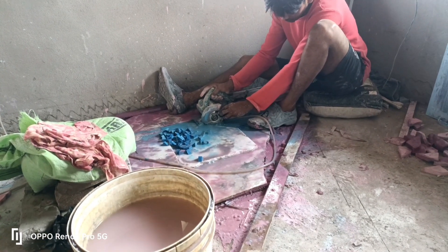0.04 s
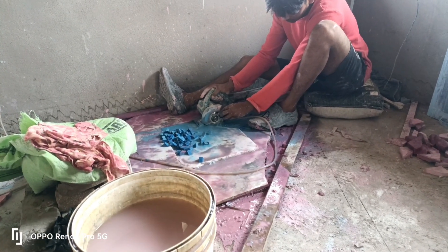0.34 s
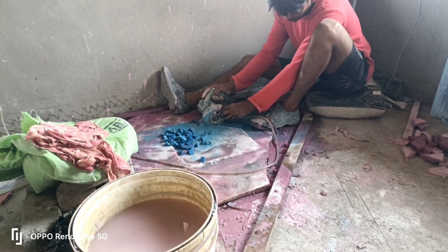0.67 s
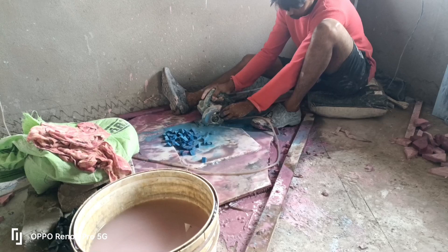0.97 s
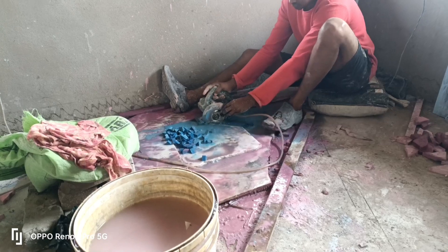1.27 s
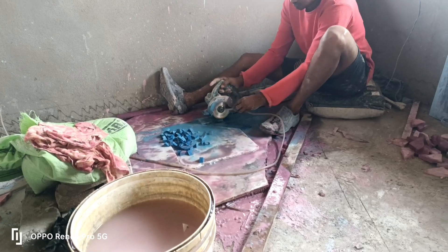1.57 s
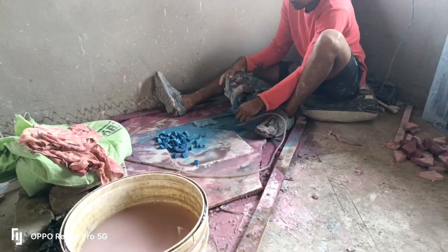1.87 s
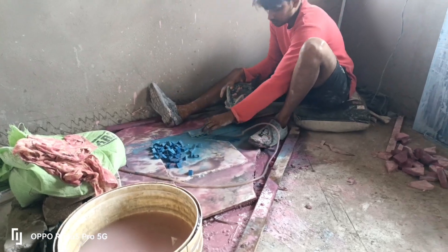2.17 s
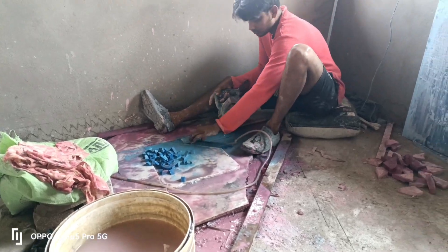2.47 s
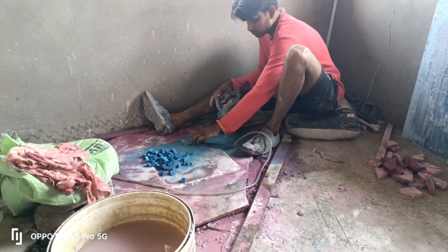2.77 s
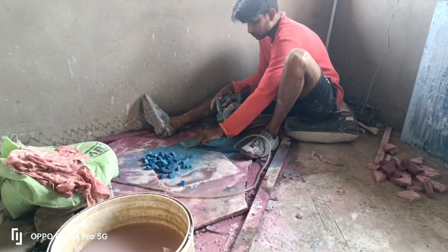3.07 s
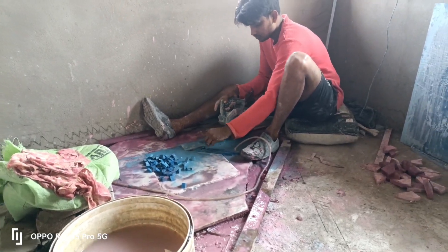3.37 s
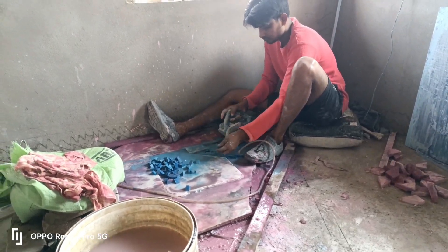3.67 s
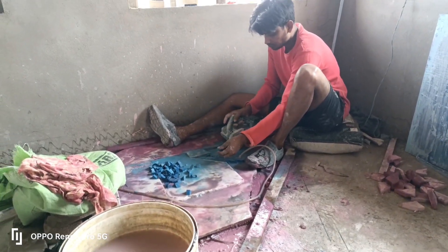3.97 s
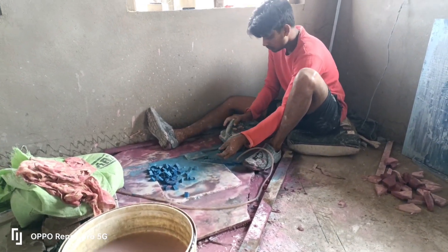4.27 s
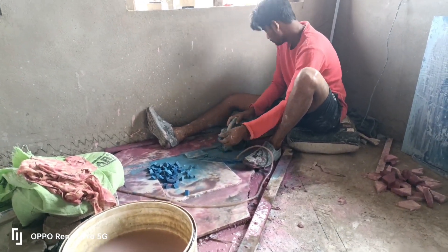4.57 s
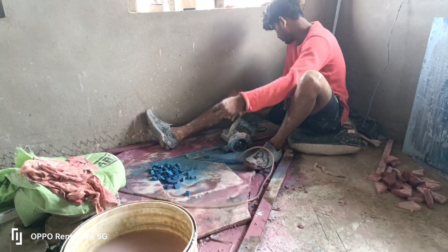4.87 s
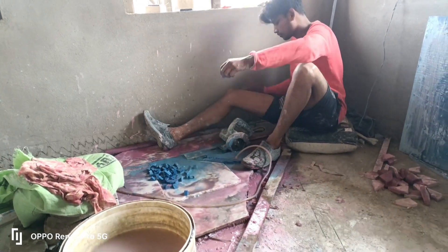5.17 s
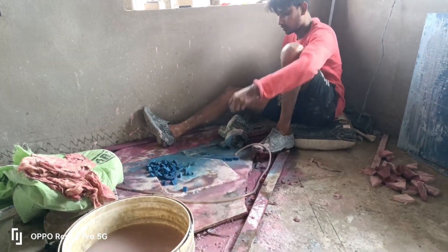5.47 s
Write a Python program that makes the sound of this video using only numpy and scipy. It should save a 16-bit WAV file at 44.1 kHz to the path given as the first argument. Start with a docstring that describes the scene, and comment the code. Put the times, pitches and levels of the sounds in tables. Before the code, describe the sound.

In a bare room, a power cutter rasps through stone with a gritty hiss and a high ringing from the blade, puffs of air thumping the microphone at first. After under two seconds it is switched off and its whine slides steadily downward. A quick cluster of clacks and thumps follows as it is put down, then light scraping and a sharp stone clink above a faint hum.

```python
"""A handheld electric cutter grinds through marble in a bare room, its air blast buffeting the left mic.
The rim bites on every turn and buzzes until the stone crumbles; grit hisses and the blade sings.
Lifted and switched off, the motor coasts down, its falling whine sweeping the housing resonances.
The cutter clatters onto the stone floor, body and blade ringing.
Small scrapes and a clink of stone follow over a low, distant drone."""
import sys
import numpy as np
from scipy import signal
from scipy.fft import rfft, irfft, next_fast_len
from scipy.io import wavfile

SR = 44100
rng = np.random.default_rng(int(sys.argv[2]) if len(sys.argv) > 2 else 0)


def bounce(signal):
    """Save signal as a 16-bit WAV file at the path given by the first command-line argument."""
    frames = np.transpose(np.atleast_2d(signal))
    limited = np.clip(frames, -1, 1)
    pcm = np.round(limited * 32767).astype(np.int16)
    wavfile.write(sys.argv[1], SR, pcm)


N = 248283
TIME = np.arange(N) / SR
FREQS = np.maximum(np.arange(N // 2 + 1) * SR / N, 1)


def from_db(db):
    """Decibels to gain."""
    return 10 ** (np.asarray(db) / 20)


def rms_one(x):
    """Scale to unit power."""
    return x / np.sqrt(np.mean(x ** 2) + 1e-20)


def in_time(rows):
    """Each column of a curve at every sample."""
    s, *columns = np.transpose(rows)
    return [np.interp(TIME, s, c) for c in columns]


def at_hz(points, hz):
    """Read a spectrum on a log-frequency axis."""
    f, value = np.transpose(points)
    return np.interp(np.log(hz), np.log(f), value)


def ramp(start_s, length_s):
    """Linear rise from 0 to 1."""
    return np.clip((TIME - start_s) / length_s, 0, 1)


def swell(centre_s, length_s, t=TIME):
    """Gaussian bell in time."""
    return np.exp(-(2 * (t - centre_s) / length_s) ** 2)


def dying(after_s, t60):
    """Gain 1, then exponential decay."""
    return from_db(-60 * np.maximum(TIME - after_s, 0) / t60)


def fading(hz, knee_hz):
    """Gain that falls steeply below a knee."""
    return 1 / np.sqrt(1 + (knee_hz / hz) ** 6)


def drift(rate_hz):
    """Slow random wander, rms 1."""
    hop, settle = 40, 2000
    r = np.exp(-2 * np.pi * hop * rate_hz / SR)
    slow = signal.lfilter([1], [1, -2 * r, r * r], rng.standard_normal(N // hop + settle + 2))[settle:]
    return np.interp(np.arange(N) / hop, np.arange(len(slow)), rms_one(slow))


def shape(points):
    """Gain per frequency of a spectrum, falling steeply past its ends."""
    low, high = points[0][0], points[-1][0]
    skirts = np.sqrt((1 + (low / FREQS) ** 8) * (1 + (FREQS / high) ** 16))
    return from_db(at_hz(points, FREQS)) / skirts


def resonances(modes):
    """Gain per frequency of steep-sided resonances, summed in power."""
    power = 0
    for hz, width, db in modes:
        detuning = (FREQS - hz ** 2 / FREQS) / (2 * width)
        power = power + from_db(db) ** 2 / width / (1 + detuning ** 2) ** 2
    return np.sqrt(power)


# Channel likeness: f/Hz, correlation
LIKENESS = [(40, 0.52), (150, 0.97), (300, 0.89), (700, 0.72), (1200, 0.01), (2500, 0.04), (15000, 0.027)]

def stereo(mid, side, hz):
    """Left and right spectra, alike in the bass and diffuse in the treble."""
    alike = at_hz(LIKENESS, hz)
    return np.sqrt(1 + alike) * mid + np.sqrt(1 - alike) * side * [[1], [-1]]


def noise(gain):
    """Coloured stereo noise, rms 1."""
    size = next_fast_len(N, real=True)
    f = np.maximum(np.arange(size // 2 + 1) * SR / size, 1)
    mid, side = rng.standard_normal((2, 2 * len(f))).view(complex)
    return rms_one(irfft(np.interp(f, FREQS, gain) * stereo(mid, side, f), size)[:, :N])


def band(hz, width_hz):
    """One band of stereo noise, rms 1."""
    return noise(resonances([(hz, width_hz, 0)]))


def room(x, t60, direct_db):
    """Bare walls: direct sound plus a dense tail, different at each port."""
    t = TIME[:SR // 2]
    tail = rng.standard_normal((2, len(t))) * from_db(-60 * t / t60)
    tail /= np.sqrt(np.sum(tail ** 2, axis=1, keepdims=True))
    direct = from_db(direct_db)
    return (direct * x + signal.fftconvolve(x[None], tail, axes=1)[:, :N]) / np.sqrt(1 + direct ** 2)


# Envelope of the low hum, then of the closing drone: t/s, level/dB
HUM_SWELL = [(2.05, -54.5), (2.194, -49), (2.33, -41), (3.152, -40), (3.85, -50), (4.6, -39.5),
             (5.0, -38.5), (5.6, -33.5)]
# Hum resonances, and upper ones that join for the drone: f/Hz, width/Hz, level/dB
HUM_MODES = [(272, 58, 6), (327, 39, 1.5)]
DRONE_UPPER = [(452, 28, 2), (580, 170, -6.5)]
# Room noise spectra: f/Hz, density/dB
AIR = [(25, -8), (55, 13.5), (90, -9), (150, -12), (300, 3.5), (600, 2), (1000, -0.5), (1500, -4.5),
       (2400, -2), (3400, -5.5), (4500, -13.5), (6500, -29), (8300, -25.5), (14000, -41)]
RUMBLE = [(13, -46), (22, 4), (43, 3), (86, 9.5), (156, 7), (183, 0), (220, 10), (290, -21), (480, -120)]

def background():
    """Over room noise, a hum near 300 Hz swells in the coast-down; a distant drone rises at the end."""
    upper = from_db(-4.5) * ramp(3.53, 1.4) * noise(resonances(DRONE_UPPER))
    hum = from_db(in_time(HUM_SWELL)[0]) * (noise(resonances(HUM_MODES)) + upper)
    air = from_db(-47.5) * noise(shape(AIR))
    rumble = noise(shape(RUMBLE)) * from_db(-52.5 + 2 * drift(30))
    return hum + air + rumble


# Scrapes: t/s, length/s, f/Hz, width/Hz, level/dB
SCRAPES = [(3.645, 0.065, 1580, 724, -34), (4.023, 0.13, 844, 110, -22.5), (4.63, 0.36, 3500, 420, -45),
           (5.228, 0.25, 3560, 110, -47.5), (5.5, 0.0044, 8200, 500, -51), (5.509, 0.0029, 7940, 1800, -41),
           (5.543, 0.1, 5970, 4040, -55.5), (5.62, 0.044, 930, 596, -34)]
# Bumps: t/s, length/s, f/Hz, level/dB
BUMPS = [(1.47, 0.055, 125, -38), (2.254, 0.28, 86, -45.5), (3.112, 0.018, 80, -44),
         (3.805, 0.013, 54.6, -36), (4.477, 0.3, 106, -35.5)]

def scrapes_and_bumps():
    """Short swells of friction on stone, and dull bumps of a body shifting on the floor."""
    friction = sum(from_db(db) * swell(s, length) * band(hz, width)
                   for s, length, hz, width, db in SCRAPES)
    bumps = sum(from_db(db) * swell(s, length) * band(hz, hz / 2) for s, length, hz, db in BUMPS)
    return friction * from_db(drift(90)) + bumps


def add_blow(out, s, blow, rise_s=0.0014):
    """Mix in a blow at time s, with a short rise."""
    at = min(round(s * SR), N - 1)
    size = blow.shape[1]
    out[:, at:at + size] += (blow * (1 - np.exp(-TIME[:size] / rise_s)))[:, :N - at]


def ringing(modes, blow_db, spread_db):
    """Struck modes; the higher ones reach the two ports out of step."""
    t = TIME[:SR // 2]
    hz, db, t60 = np.transpose(modes)[:, :, None]
    strength = from_db(db + blow_db + spread_db * rng.standard_normal(hz.shape))
    polarity = np.pi * rng.integers(0, 2, hz.shape)
    phase = polarity + rng.standard_normal((2, *hz.shape)) * np.minimum(hz / 1200, 2)
    return (strength * from_db(-60 * t / t60) * np.sin(2 * np.pi * hz * t + phase)).sum(axis=1)


# Steel blade modes: f/Hz, level/dB, t60/s
BLADE_MODES = [(1669, -7, .28), (2363, -3, .22), (2910, 1, .4), (3260, -1, .3), (3400, 5, .35),
               (3480, 3, .38), (4060, 1, .5), (4963, -12, .29), (5190, -8, .45), (8570, -2, .27)]

def blade_ring(clacks, gain_db=-3.5, favour_octaves=0.054, splits=4, detune=0.006):
    """Each contact point favours one pitch; pressed on the floor, modes split into close partials."""
    out = np.zeros((2, N))
    for s, _, _, blade_db, favoured_hz, favour_db in clacks:
        modes = []
        for hz, db, t60 in BLADE_MODES:
            boost_db = favour_db * np.exp(-(np.log2(hz / favoured_hz) / favour_octaves) ** 2)
            modes += [(hz * rng.normal(1, detune), db + boost_db, t60) for _ in range(splits)]
        add_blow(out, s, ringing(modes, blade_db + gain_db, spread_db=1))
    chatter = 1 + 0.25 * drift(90)
    return out * chatter


# Hard floor contacts: t/s, level/dB, tilt/(dB/octave), blade level/dB, favoured f/Hz, favour/dB
CLACKS = [(3.885, -15.5, 6, -32, 3330, 7.5), (3.948, -20, 7, -39.5, 3400, 5),
          (3.975, -24.5, -2.5, -51, 5190, 18), (4.001, -25, 8.5, -34.5, 2910, 10.5),
          (4.04, -18, 1.7, -30, 3450, 3), (4.336, -17.5, 3.5, -53.5, 2363, 29.5),
          (4.353, -18.5, 1, -55, 2363, 27), (4.408, -33.5, -5, -63, 2363, 12),
          (5.507, -40.5, 0.5, -57, 8570, 3)]
# The cutter's weight landing and rocking: t/s, level/dB, strongest push f/Hz
THUMPS = [(3.894, -6.5, 275), (3.947, -21, 260), (4, -18, 245), (4.406, -15.5, 231), (4.437, -18, 243),
          (4.476, -27, 166), (4.529, -24, 208)]
# Clinks on stone: t/s, level/dB
CLINKS = [(4.064, -24), (5.544, -37.5), (5.606, -20), (5.625, -13)]
# Force spectra: f/Hz, level/dB
CLACK_FORCE = [(190, -18.5), (270, 1.5), (900, -3.5), (3600, -10), (8600, -29)]
CLINK_FORCE = [(110, -49), (190, -27), (270, -51), (900, -53), (3600, 5), (8600, -10)]
# Thump force spectrum: multiple of the push frequency, level/dB
THUMP_FORCE = [(.6, -33.5), (1, -0.5), (2, -14.5), (4, -51), (14, -24), (32, -44)]
# Cutter body modes: f/Hz, level/dB, t60/s
BODY_MODES = [(125, 5.5, 0.13), (198.5, -3, 1), (262.6, 5, 0.25), (318.3, -5, 0.24), (510, -2.5, 0.2),
              (699, 4, 0.16), (777, -3, 0.21), (886, 5.5, 0.055), (994, -6, 0.5), (1300, 0, 0.1),
              (1813, -6, 0.32), (2325, -10.5, 0.57), (3260, -9.5, 0.24)]
# Diffuse room clatter: f/Hz, density/dB
CLATTER = [(50, -3), (130, 19.5), (260, 4), (450, -5.5), (900, 0), (1500, -7.5), (2400, -13), (3600, -10.5),
           (4500, -19), (5500, -23.5), (6500, -28), (8600, -19), (11000, -24.5), (15000, -30)]

def knocks(body_db=-3.5, clatter_db=9, room_t60=0.52):
    """Each blow rings the cutter's body and sets off a room clatter; clacks also ring the blade."""
    out, t = np.zeros((2, N)), TIME[:SR // 2]
    f = np.maximum(np.arange(len(t) // 2 + 1) * SR / len(t), 1)
    clatter = np.interp(f, FREQS, shape(CLATTER))
    blows = [(s, [(hz, db + part + tilt * np.log2(hz / 900)) for hz, part in CLACK_FORCE])
             for s, db, tilt, *_ in CLACKS]
    blows += [(s, [(k * hz, db + part) for k, part in THUMP_FORCE]) for s, db, hz in THUMPS]
    blows += [(s, [(hz, db + part) for hz, part in CLINK_FORCE]) for s, db in CLINKS]
    mode_hz = np.array(BODY_MODES)[:, :1]
    for s, force in blows:
        body = ringing(BODY_MODES, at_hz(force, mode_hz) + body_db, spread_db=0)
        mid, side = rfft(rng.standard_normal((2, len(t))))
        colour = clatter * from_db(at_hz(force, f) + clatter_db)
        diffuse = irfft(colour * stereo(mid, side, f), len(t))
        add_blow(out, s, body + diffuse * from_db(-60 * t / room_t60))
    return out + blade_ring(CLACKS)


# Gusts: start/s, end/s, level/dB
GUSTS = [(0, 0.005, -15), (0.152, 0.28, -26), (0.285, 0.563, -17.5), (0.715, 0.887, -19.5)]
# Buffeting spectrum: f/Hz, density/dB
BUFFET = [(13, -28), (22, -5), (43, -2.5), (124, -5), (250, -7.5), (400, -12), (800, -12.5), (1500, -16),
          (3000, -17)]
# Strongest puffs: t/s, level/dB
PUFFS = [(0.005, -9), (0.06, -14), (0.08, -13), (0.121, -8), (0.125, -9), (0.17, -9), (0.189, -12),
         (0.203, -13), (0.215, -11), (0.222, -10), (0.253, -12), (0.289, -8), (0.302, -9), (0.329, -11),
         (0.34, -10), (0.362, -10), (0.402, -7), (0.421, -10), (0.439, -6), (0.459, -8), (0.472, -7),
         (0.495, -10), (0.547, -6), (0.56, -9), (0.582, -6), (0.722, -9), (0.741, -7), (0.768, -9),
         (0.794, -10), (0.807, -4), (0.829, -10), (0.855, -10), (0.874, -10), (0.906, -11)]

def air_blast(corner_hz=1260, relax_s=0.002, rebound_hz=55, weak_puffs_per_s=90):
    """Eddies of the cutter's air slap the left port: low buffeting and sharp, brief puffs."""
    gusts = sum(from_db(db) * ramp(start, 0.0045) * dying(end, t60=0.22) for start, end, db in GUSTS)
    draught = from_db(-26.5) * dying(0.938, t60=0.22)
    kicks = (rng.random(N) < 300 / SR) * rng.standard_normal(N)
    eddies = rms_one(kicks) + 0.36 * rng.standard_normal(N)
    buffeting = (gusts + draught) * rms_one(irfft(rfft(eddies) * shape(BUFFET), N))
    t = TIME[:SR // 20]
    attack = 1 - np.exp(-2 * np.pi * corner_hz * t)
    slap = attack * np.exp(-t / relax_s) * np.cos(2 * np.pi * rebound_hz * t)
    puffs = (rng.random(N) < weak_puffs_per_s / SR) * from_db(-17) * gusts / gusts.max()
    for s, db in PUFFS:
        puffs[round(s * SR)] = from_db(db)
    wind = buffeting + from_db(6.5) * signal.fftconvolve(puffs * rng.choice([-1, 1], N), slap)[:N]
    return 0.7 * np.tanh(wind / 0.7) * from_db([[0], [-32]])


WHINE_PER_TURN, OFF_S, CUTOFF_HZ = 16, 1.68, 15500
# Whine pitch under power: t/s, f/Hz
DRIVEN_PITCH = [(0, 2336), (.14, 2369), (.3, 2389), (.44, 2409), (.63, 2387), (.78, 2394), (.95, 2352),
                (1.22, 2320), (1.53, 2235), (1.69, 2238)]

def whine_pitch(braking_hz_per_s=938, easing_s=6.9):
    """Motor speed as whine pitch: driven, then braked by friction that eases as it slows."""
    coasted_s = np.maximum(TIME - OFF_S, 0)
    lost_hz = braking_hz_per_s * easing_s * (1 - np.exp(-coasted_s / easing_s))
    return np.maximum(in_time(DRIVEN_PITCH)[0] - lost_hz, 100)


# Fan housing air resonances and broad rush: f/Hz, width/Hz, level/dB
FAN_MODES = [(669, 45.6, 22.5), (777, 17, 13.5)]
FAN_RUSH = [(943, 550, -1.5)]

def fan(whine_hz, speed, ducked_db, blades=8, swell_hz=710, swell_octaves=0.37):
    """A rush that follows the speed, and a hum that swells as the blade rate meets the air resonance."""
    off_tune = np.log2(blades * whine_hz / WHINE_PER_TURN / swell_hz) / swell_octaves
    hum_db = -45.5 + 16.5 / (1 + off_tune ** 2)
    hum = from_db(hum_db) * fading(whine_hz, knee_hz=790) * noise(resonances(FAN_MODES))
    rush = from_db(-31 + ducked_db) * speed ** 1.54 * noise(resonances(FAN_RUSH))
    return hum + rush


# Bearing hiss: f/Hz, density/dB
BEARINGS = [(3240, -69), (5500, -5), (6480, -22), (7160, -3.5), (8270, -0.5), (10600, -6.5), (14000, -3.5),
            (15500, -13)]

def bearings(speed, ducked_db):
    """The bearings hiss less as the rotor slows."""
    return from_db(-45.5 + ducked_db) * speed ** 0.82 * noise(shape(BEARINGS))


# Gear noise: f/Hz, density/dB
GEARS = [(530, -44), (900, -19), (1210, -14), (1530, -16), (1730, -8), (2130, 2), (2470, -1), (2590, -1),
         (2910, -4.5), (3330, 1), (4790, -20), (5600, -20), (6500, -29), (8450, -63), (14300, -120)]
# Casing shudders: whine f/Hz, whine span/Hz, ringing f/Hz, width/Hz, level/dB
SHUDDERS = [(1430, 210, 3290, 140, -33), (1900, 250, 1050, 150, -39.5)]

def gears(turns, whine_hz, speed, ducked_db):
    """The gears rattle, and shake the casing as they coast through certain speeds."""
    rattle = from_db(drift(60) + 0.16 * np.sin(2 * np.pi * turns))
    mesh = from_db(-30 + ducked_db) * speed ** 0.3 * noise(shape(GEARS))
    shudder = sum(from_db(db) * np.exp(-((whine_hz - at) / span) ** 2) * band(hz, width)
                  for at, span, hz, width, db in SHUDDERS)
    return rattle * (mesh + shudder)


# Housing radiation: f/Hz, gain/dB
HOUSING = [(400, -22), (1300, -5), (1700, -2), (1900, 4.5), (2100, 9), (2500, 12), (2700, 10), (3300, 8),
           (3750, -20), (4600, -5), (5600, -9), (6400, -7), (7300, -1), (8500, 3), (10200, -4), (11000, -8),
           (11700, 0), (13000, -14), (14500, -6)]
# Housing resonances, keyed by whine harmonic: f/Hz, half width/Hz, level/dB
FLARES = {1: [(2250, 35, -38), (2040, 22, -32.5), (1965, 22, -33), (1810, 60, -44)], 2: [(3270, 75, -34),
          (3020, 65, -35), (2765, 45, -38), (2445, 50, -24.5), (2330, 60, -32), (2190, 40, -24),
          (2095, 25, -28), (1875, 50, -32.5), (1230, 40, -42)], 3: [(5550, 150, -50)], 4: [(7950, 150, -48),
          (7150, 220, -45), (6600, 120, -51), (5560, 100, -47), (4080, 110, -43), (3720, 120, -33),
          (3300, 200, -37), (3050, 110, -35.5), (2400, 130, -35), (2130, 100, -33.5)],
          5: [(7000, 300, -53)], 6: [(9450, 300, -54), (7750, 350, -53), (7000, 250, -54),
          (5750, 300, -59)]}

def housing_gain(k, db, whine_hz, driven, hop=64):
    """Gain of harmonic k: the housing's broad colour plus a flare at each resonance it crosses."""
    pitch = whine_hz[::hop]
    hz = k * pitch
    level_db = -50 + 4 * driven[::hop] + db + at_hz(HOUSING, hz)
    power = (from_db(level_db) * fading(pitch, knee_hz=697)) ** 2
    for centre, width, flare_db in FLARES.get(k, []):
        power += from_db(flare_db + 0.5) ** 2 / (1 + ((hz - centre) / width) ** 2) ** 2
    return np.interp(TIME, TIME[::hop], np.sqrt(power) * (hz < CUTOFF_HZ))


def wandering_line(phase, rate_hz, blur):
    """A partial whose strength and phase flutter, rms 1."""
    flutter = drift(rate_hz) * np.cos(phase) + drift(rate_hz) * np.sin(phase)
    return (np.cos(phase) + blur * flutter) * np.sqrt(2 / (1 + 2 * blur ** 2))


# Whine partials: harmonic, level/dB
WHINE = [(1, -1), (2, 2), (3, -6), (4, -4), (5, -10), (6, -8), (7, -11), (8, -9), (10, -10), (12, -10)]

def whine(turns, whine_hz, driven, jitter_rad=0.066, flicker_db=2.5):
    """Flickering harmonics of a slightly uneven rotor, swinging once a turn, smeared by the room."""
    phase = 2 * np.pi * WHINE_PER_TURN * turns + jitter_rad * drift(34)
    tone = 0
    for k, db in WHINE:
        gain = housing_gain(k, db, whine_hz, driven) * from_db(flicker_db * drift(10))
        tone = tone + gain * wandering_line(k * phase, rate_hz=25 + 14 * k, blur=0.2 * k + 0.05)
    swing = 1 + 0.33 * np.sin(2 * np.pi * turns)
    return room(tone * swing, t60=0.36, direct_db=3)


def motor(turns, whine_hz, recovers_s=0.57):
    """Whine, gears, bearings and fan all follow one speed."""
    speed = whine_hz / whine_hz.max()
    driven = 1 - ramp(OFF_S, recovers_s)
    # gears, bearings and fan rush sound ducked during the loud cut and swell back after switch-off
    ducked_db = -4.5 * driven
    tone = whine(turns, whine_hz, driven)
    rattle = gears(turns, whine_hz, speed, ducked_db)
    hiss = bearings(speed, ducked_db)
    air = fan(whine_hz, speed, ducked_db)
    return tone + (rattle + air) * dying(3.94, t60=2.9) + hiss * dying(3.9, t60=1.2)


SINGS_S = 0.91
# Blade resonances in the groove: initial f/Hz, sag/(Hz/s), width/Hz, level/dB, onset/s
SINGING = [(3380, 150, 40, 4, .95), (3750, 320, 100, 6, .95), (3830, 0, 30, 0, 1.35),
           (4370, 260, 42, 6, .95), (5230, 40, 25, -10, 1.35), (5445, 25, 28, -3, 1.15),
           (7050, 0, 12, -17, 1.4), (7520, 0, 12, -14, 1.4), (8185, 0, 12, -12, 1.4),
           (8550, 410, 110, -14, .95), (11400, 0, 50, -18, 1.1)]

def blade_song():
    """Narrow resonances rubbed by the groove join in turn; some sag as the blade moves through."""
    out = 0
    for hz, sag, width, db, start in SINGING:
        phase = 2 * np.pi * np.cumsum(hz - sag * np.clip(TIME - SINGS_S, 0, 1)) / SR
        cos, sin = np.cos(phase), np.sin(phase)
        line = np.array([drift(width) * cos + drift(width) * sin for _ in range(2)])
        out = out + from_db(db) * ramp(start, 0.059) * line
    return rms_one(out)


# Rim buzz spectrum: f/Hz, level/dB
BUZZ = [(1000, -16), (1500, -16.5), (2600, -10.5), (3400, -5.5), (4400, -5.5), (5000, -10), (5350, -10),
        (5700, -23.5), (6600, -26), (7600, -16), (8300, -9.5), (8900, -25), (11000, -26)]
# Prominent multiples of the turn rate
BITE_ORDERS = [14, 16, 19, 20, 20, 22, 23, 24, 25, 25, 26, 27, 28, 30, 32, 55, 56]
# Swell of each: level/dB, t/s, length/s
BITE_SWELLS = [(-10, .65, .3), (-3, .25, .8), (-6, .27, .35), (-1, .2, .14), (4.5, .66, .28), (-2, .4, 1.6),
               (-3, .3, .25), (1.5, .35, 1.1), (0, .05, .25), (3, .46, .14), (2.5, .15, .8), (4, .4, 2),
               (1.5, .55, .35), (1, .04, .18), (3, .52, .5), (-6, .45, 1.4), (-9, .1, .3)]

def rim_buzz(turns, length_s, waver=0.6, stumble_turns=0.0018):
    """Multiples of the turn rate swell in turn as the contact patch shifts; rms 1 while cutting."""
    end = round(length_s * SR)
    buzz, knots = np.zeros((2, N)), np.linspace(0, end / SR, 40)
    turn_hz = turns[end] * SR / end
    turns = turns + stumble_turns * drift(18)   # stumbling over the grain makes it rasp
    orders = np.arange(9, 60)
    power = np.outer(from_db(at_hz(BUZZ, orders * turn_hz)) ** 2, np.ones_like(knots))
    for order, (db, s, length) in zip(BITE_ORDERS, BITE_SWELLS):
        power[order - orders[0]] += from_db(db) ** 2 * swell(s, length, knots)
    for order, gain in zip(orders, np.sqrt(power / power.sum(axis=0))):
        re, im = rng.standard_normal((2, len(knots)))
        envelope = np.interp(TIME[:end], knots, gain * (1 + waver * (re + 1j * im)))
        port_phase = rng.uniform(0, 2 * np.pi) + rng.standard_normal((2, 1))
        buzz[:, :end] += np.real(envelope * np.exp(1j * (2 * np.pi * order * turns[:end] + port_phase)))
    return rms_one(buzz) * np.sqrt(end / N)


# Cut envelope: t/s, grinding level/dB, dust level/dB
CUT = [(0.0, -18.5, -29), (0.334, -18.5, -27), (0.416, -18, -25.5), (0.746, -18.5, -29), (0.906, -17, -28),
       (0.976, -18, -33), (1.222, -15.5, -31), (1.382, -18, -41.5), (1.478, -14, -30.5), (1.528, -16, -37),
       (1.628, -17.5, -30.5), (1.724, -27.5, -49), (1.8, -24, -55)]
# Grit deep in the cut, grit at breakthrough, fine dust: f/Hz, density/dB
GRIT_DEEP = [(260, -69), (450, -23), (614, -42), (781, -42), (1290, -15), (1520, -19), (1930, -12.5),
             (2490, -13.5), (3600, 1), (4030, -3), (4420, -3.5), (5500, -11.5), (6530, -37.5), (7000, -53),
             (9100, -51), (15400, -120)]
GRIT_EXIT = [(260, -55), (450, -16.5), (650, -11.5), (917, -15), (1340, -3.5), (1830, -15.5), (2190, -4),
             (2960, 2.5), (3360, 2), (4320, 1.5), (4520, -8), (5440, -16), (5760, -14), (7000, -32),
             (9100, -49), (15400, -120)]
DUST = [(3820, -2), (6500, -13.5), (6740, -14.5), (8260, -3), (8950, -11), (9980, -14.5), (11700, -12),
        (12300, -16), (13300, -18.5), (14500, -13.5), (15500, -25)]

def grinding(turns, crumbles_s=0.765, breakthrough_s=1.18):
    """The rim bites alike on every turn until the stone crumbles; grit hisses and the blade sings."""
    cut_db, dust_db = in_time(CUT)
    buzz_share = 0.89 * (1 - ramp(crumbles_s, 0.06))
    song_share = 0.7 * ramp(SINGS_S, 0.34)
    exit_share = ramp(breakthrough_s, 0.21)
    chipping = from_db(drift(240) + 1.3 * drift(15.6))
    deep = np.sqrt(1 - exit_share) * noise(shape(GRIT_DEEP))
    grit = (deep + np.sqrt(exit_share) * noise(shape(GRIT_EXIT))) * chipping
    buzz = rim_buzz(turns, length_s=CUT[-1][0] + 0.1)
    bite = np.sqrt(buzz_share) * buzz + np.sqrt(1 - buzz_share) * grit
    cut = from_db(cut_db + 5) * np.sqrt(1 - song_share) * bite * from_db([[-3], [1]])
    dust = from_db(dust_db + 5) * noise(shape(DUST)) * chipping * np.sqrt(1 - 0.7 * buzz_share)
    song = from_db(cut_db + 2) * np.sqrt(song_share) * blade_song()
    return (cut + dust) * dying(OFF_S, t60=0.28) + song * dying(1.654, t60=0.44)


def scene():
    """Grinding and motor share one rotation; knocks, scrapes and background are added."""
    whine_hz = whine_pitch()
    turns = np.cumsum(whine_hz) / SR / WHINE_PER_TURN
    floor_blows = knocks()
    return grinding(turns) + motor(turns, whine_hz) + floor_blows + scrapes_and_bumps() + background()


# Microphone port colour: f/Hz, left minus right/dB
PORTS = [(100, -2), (700, -1), (1300, -1.5), (2000, -5.5), (2800, -11.5), (3500, -7.5), (4400, -10),
         (5500, -2), (6600, -2), (7100, 29), (8600, 42), (9300, 28), (9700, 15), (12000, 9), (15000, 1)]

def record(dry):
    """Each port has its own colour and the left catches the blast; soft clip, then a steep low-pass."""
    ratio = from_db(at_hz(PORTS, FREQS))
    ports = np.array([ratio, np.ones_like(ratio)]) * np.sqrt(2 / (1 + ratio ** 2))
    heard = irfft(rfft(dry) * ports, N) + air_blast()
    lowpass = signal.ellip(10, 0.1, 80, CUTOFF_HZ, fs=SR, output="sos")
    return signal.sosfilt(lowpass, np.tanh(heard))


dry = scene()
out = record(dry)
bounce(out)
```